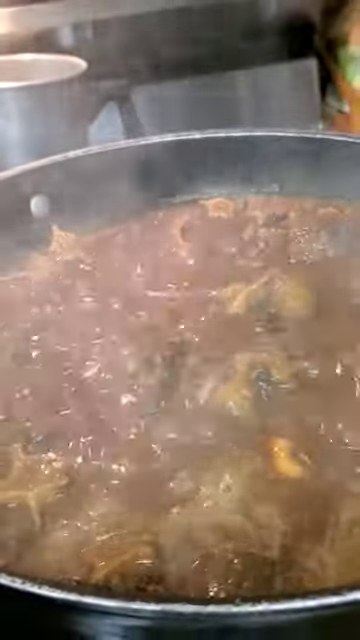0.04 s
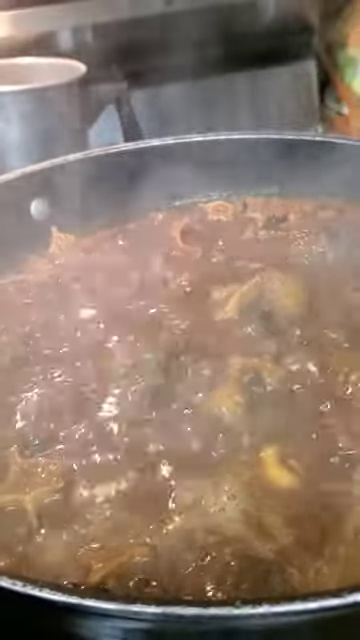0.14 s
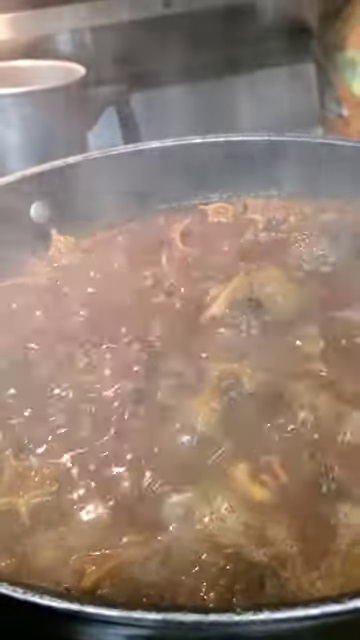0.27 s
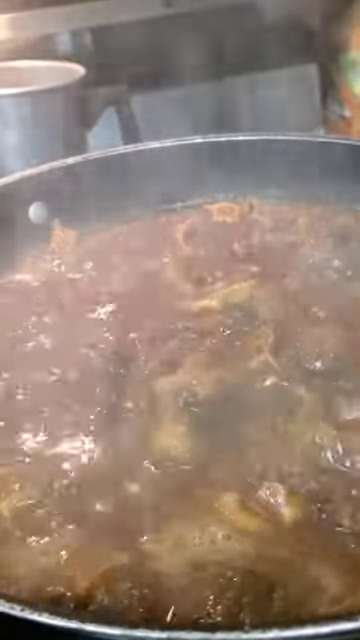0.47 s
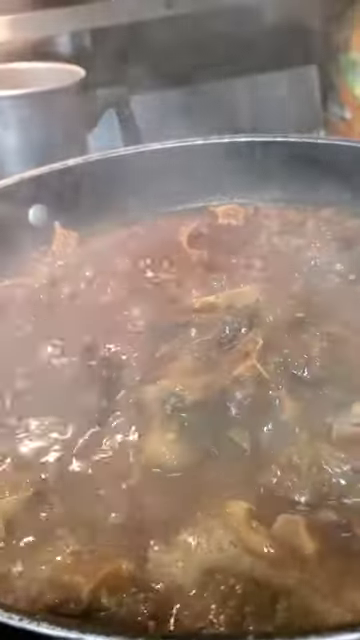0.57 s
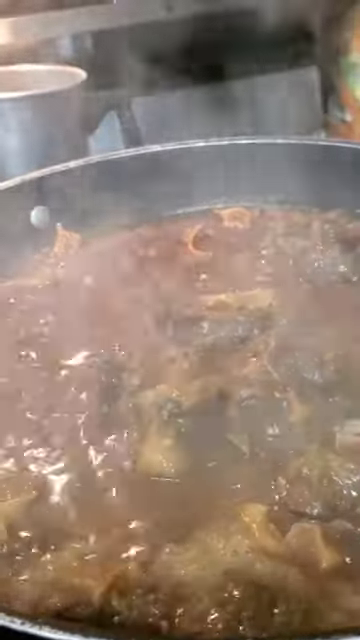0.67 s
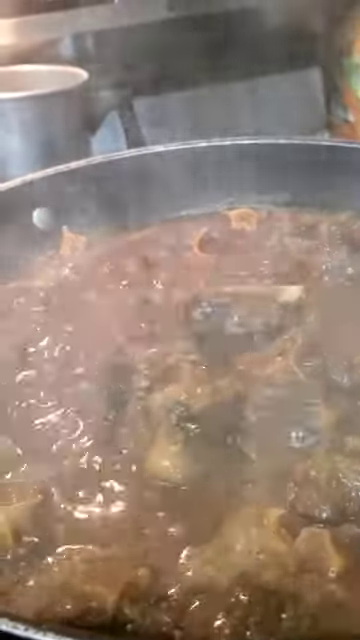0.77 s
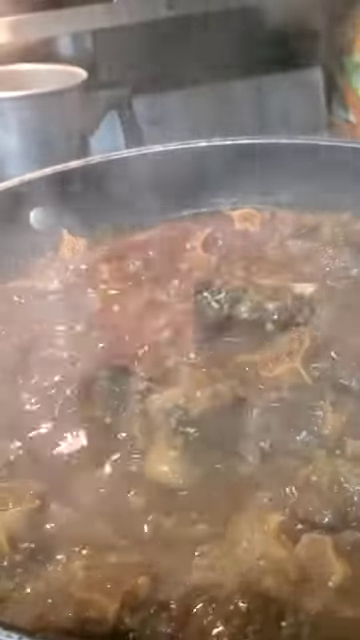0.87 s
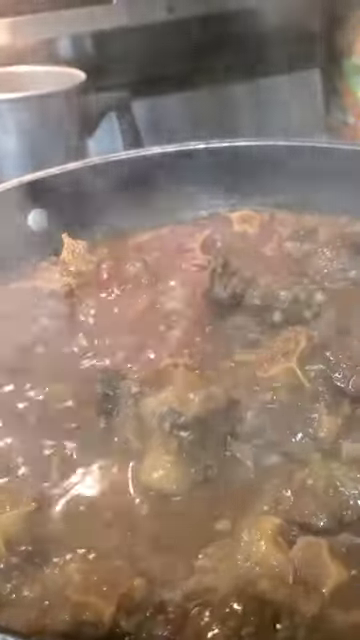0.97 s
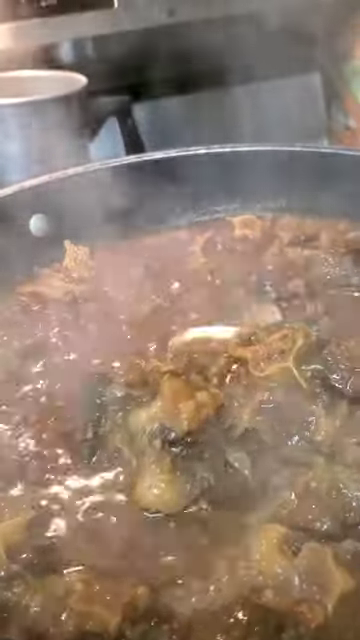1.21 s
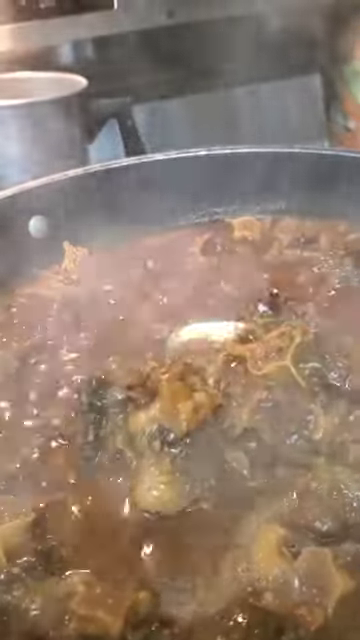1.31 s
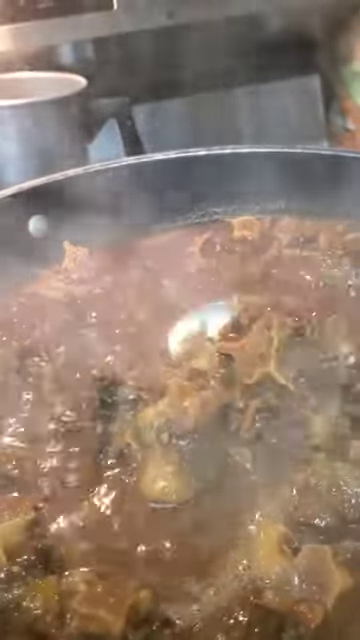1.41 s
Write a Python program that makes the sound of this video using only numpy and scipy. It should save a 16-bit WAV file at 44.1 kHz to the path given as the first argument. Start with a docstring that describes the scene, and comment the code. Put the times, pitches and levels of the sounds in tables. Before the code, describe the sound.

Close stereo sound of a heavy stew bubbling steadily in a home kitchen, slightly stronger on the left; a sharp short clack and brief chafing come early, then plops, tiny fat spits, faint hiss and low hum continue.

```python
"""Thick gravy boils in a wide pan close by: damped tones that rise in pitch make dull, dense bubbles.
A few pop out louder, and thin spits of fat are short bursts of bright noise.
A piece of cookware is knocked hard on the right, then lightly: decaying modes ring with a noise crack,
chafing noise drives the same ring, and a decaying noise tail is the kitchen's answer.
Behind it lie steam (shaped noise, patchy in level) and a burner (low noise roar and wavering hum)."""
import sys
import numpy as np
from scipy import signal
from scipy.fft import rfft, irfft, next_fast_len
from scipy.io import wavfile
from scipy.ndimage import uniform_filter1d, map_coordinates

SR = 44100
rng = np.random.default_rng(int(sys.argv[2]) if len(sys.argv) > 2 else 0)


def volts_from_decibels(level):
    """Turn decibel levels (scalar or array-like) into linear amplitude factors."""
    exponent = np.asarray(level, float) / 20
    return 10 ** exponent


def generate_wav(signal):
    """Clip the signal to [-1, 1] and save it as 16-bit WAV at the path in sys.argv[1]."""
    frames = np.transpose(np.atleast_2d(signal))
    scaled = np.clip(frames, -1, 1) * 32767
    pcm = np.round(scaled).astype(np.int16)
    wavfile.write(sys.argv[1], SR, pcm)


N = 63945

# Loud bubbles. Each row: start in seconds, peak in dB before low cut and stereo lean,
# starting pitch in Hz, life in cycles (to fall by 30 dB).
LOUD_BUBBLES = [(0.034, -38.5, 693, 12.4), (0.045, -43.5, 680, 17), (0.058, -33.5, 652, 11),
                (0.067, -34, 680, 2.7), (0.083, -42, 627, 2), (0.153, -35.5, 566, 3.1),
                (0.162, -41, 680, 3.9), (0.191, -42, 580, 11), (0.4179, -38.5, 694, 5.2),
                (0.503, -37.5, 770, 2.4), (0.656, -40, 734, 17), (0.678, -33, 720, 1.1),
                (0.733, -44, 710, 12), (0.7565, -36.5, 705, 5.3), (0.768, -37.5, 665, 8.4),
                (0.804, -38.5, 573, 7.4), (0.815, -41.5, 560, 9.3), (0.829, -41.5, 510, 5.7),
                (0.891, -39.5, 635, 10), (0.921, -36, 666, 7.3), (0.977, -29, 640, 4.2),
                (0.994, -35.5, 590, 8.1), (1.001, -35.5, 630, 0.76), (1.033, -37.5, 613, 3.3),
                (1.045, -36, 730, 1.8), (1.122, -35, 610, 2.1), (1.127, -37.5, 795, 3.1),
                (1.158, -38.5, 532, 5.2), (1.166, -42, 710, 3.7), (1.199, -43.5, 600, 2.3),
                (1.243, -41.5, 614, 5.3), (1.338, -35.5, 810, 5), (1.431, -39, 607, 3.2),
                (0.4821, -40, 1090, 13), (0.5126, -32.5, 1173, 11), (0.9066, -34, 1390, 2.6),
                (0.9399, -37.5, 1050, 7.4), (0.9582, -38, 1200, 14), (1.0114, -41.5, 1086, 13),
                (1.0231, -37, 1200, 7.5), (1.077, -34.5, 1180, 3.3), (1.3159, -40, 1480, 2.8),
                (1.3417, -34.5, 1040, 6.8), (1.3977, -39, 1300, 5.9), (1.4147, -44, 1260, 5),
                (0.2089, -32.5, 950, 2), (.0085, -35.5, 2230, 4.4), (0.057, -36, 3230, 8.1),
                (.963, -40.5, 3230, 6.4), (1.039, -27, 1880, 9.7), (1.0467, -31, 3590, 14.5),
                (.366, -37, 1460, 5.3), (.595, -30, 1580, 3.5), (0.688, -35, 1630, 3.8),
                (0.7473, -39, 1340, 6.4), (0.828, -43, 1350, 3.5), (0.888, -41, 1160, 6.2),
                (0.9946, -40, 1220, 6.4), (1.1772, -41, 1210, 8.4), (1.261, -40, 1160, 3.9),
                (1.266, -42.5, 690, 1.8), (1.1605, -38, 1250, 5.9), (0.921, -41, 1290, 4),
                (1.0405, -35, 2450, 6.6), (.905, -40, 696, 4), (1.0339, -35, 1040, 3)]
# Thin spits of fat. Each row: start in seconds, level in dB before the tone filter and stereo lean.
FAT_SPITS = [(0.655, -30), (0.9913, -30.5), (1.042, -41), (1.3963, -30)]
# Strength of the boil over time. Each row: time in seconds, level in dB.
BOIL_STRENGTH = [(0, -39), (.09, -49.5), (.13, -51.5), (.2, -41.5), (.4, -45), (.5, -40.5), (.6, -43.5),
                 (.7, -50.5), (.8, -46.5), (.86, -54), (.9, -50.5), (1.04, -41.5), (1.09, -66),
                 (1.15, -48.5), (1.29, -55), (1.45, -50)]
# Modes of the knocked object. Each row: frequency in Hz, relative left level in dB,
# relative right level in dB, time to fall by 60 dB in seconds.
OBJECT_MODES = [(121, -28, -27, 0.15), (310.6, -39, -39, 0.71), (414.4, -28.5, -25.5, 0.3),
                (523, -13.5, -15, 0.047), (770, -4, 0, 0.022), (944, -6.5, -9, 0.037),
                (1153, 2.5, 3, 0.018), (1390, 3.5, -3.5, 0.016), (815, -29, -27.5, 0.48),
                (1101, -41, -36, 0.29), (1346, -34.5, -32.5, 0.34), (2020, -47, -38, 0.3),
                (1953, 0, 8.5, 0.012), (2275, 1.5, -18, 0.0094), (2794, -5.5, -7.5, 0.017),
                (2917, -29.5, -24, 0.31), (3204, -3, 9, 0.0068), (4184, -35, 2.5, 0.0065),
                (5630, -12, -16.5, 0.014), (6650, -15, -26, 0.01)]
# Colour of the knock's crack and clatter. Each row: frequency in Hz, relative level in dB.
CRACK_COLOUR = [(40, -42), (200, 2), (600, -44), (1100, -18.5), (1600, -2), (2700, -3), (5200, -15.5),
                (8000, -23.5), (11000, -55), (15000, -35)]
# The object touches down again. Each row: time in seconds, level in dB.
TOUCHDOWNS = [(0.231, -22), (.3362, -32)]
# Light chafing of the same object. Each row: start in seconds, length in seconds, level in dB,
# centre of its brightness in Hz.
CHAFINGS = [(0.289, 0.11, -23, 3540), (0.482, 0.11, -29, 3500), (0.557, 0.091, -27.5, 1600)]
# Decay of the kitchen's answer. Each row: frequency in Hz, time to fall by 60 dB in seconds.
KITCHEN_DECAY = [(150, 0.069), (800, 0.34), (3000, 0.3), (7000, 0.24), (14000, 0.05)]
# Colour of the steam. Each row: frequency in Hz, relative level in dB per Hz.
STEAM_COLOUR = [(710, -26), (1200, -1.5), (1610, -1.5), (2270, -2), (3040, -1), (3820, -1), (5790, 1.5),
                (8880, -11.5), (14500, -9.5)]
# Stereo lean of the steam. Each row: frequency in Hz, extra left minus right gain in dB.
STEAM_LEAN = [(1500, -1), (5000, 1.5), (9000, 17.5), (14000, -0.5)]
# Colour of burner and kitchen. Each row: frequency in Hz, relative level in dB per Hz.
ROAR_COLOUR = [(12, -43), (20, -14), (75, 3), (157, 2), (301, 3), (360, -7.5), (630, 4), (841, -1),
               (990, -15), (1500, -36), (1950, -48), (3300, -120)]
# Hum of a machine nearby. Each row: frequency in Hz, sine amplitude in dB.
HUM_TONES = [(69, -65), (121, -68.5)]
# Likeness of left and right in the noises. Each row: frequency in Hz, correlation from -1 to 1.
LIKENESS = [(60, 0.81), (180, 1), (550, 0.25), (1650, 0.34), (4970, -0.27), (15000, 0.17)]

# Small bubbles: middle pitch, its spread (natural log), mean life (cycles)
SMALL_PER_S, SMALL_HZ, SMALL_SPREAD, SMALL_CYCLES = 410, 822, 0.59, 2.33
SMALL_SIZE_DB, SMALL_TOP_DB, SMALL_DB = 1.5, 9, -1.5  # size spread, largest over least, trim
PITCH_RISE, SOFT_CYCLES = .3, .6  # share of pitch gained per life, soft start
OVERTONE_RATIO, OVERTONE_DB = 2.28, -12  # a bursting bubble's short upper partial
PLOP_LOW_HZ = 318  # bursts carry little below this
PAN_LAG_S, PAN_LEAN_DB = .00009, 5.5  # the right hears the pan later and weaker

KNOCK_S, KNOCK_DB, RIGHT_EARLY_S, SWELL_CYCLES = .2274, -6, .00021, 1.87
CRACK_RISE_S, CRACK_DB, CRACK_T60_S = .0003, -10, .009
CLATTER_DB, CLATTER_T60_S = -20, 0.1
WAVER_RAD, WAVER_PER_S = 1.3, 45  # phase drift of the loose object's modes
# The loose object's ring is uneven in level, less so in the bass
FLUTTER_DB, FLUTTER_PER_S, FLUTTER_FROM_HZ = 5, 90, 800
CHAFING_OCTAVES = 1.5  # width of the chafing's colour
KITCHEN_PAN_DB, KITCHEN_KNOCK_DB, KITCHEN_GAP_S = -13, -15, .004

STEAM_DB, STEAM_PATCHY_DB, ROAR_DB = -55, 1.5, -54.5
CEILING, KNEE, TOP_HZ = .9, 4, 14650  # a soft limit keeps the highest peaks from clipping


def unit(x):
    """Scale to rms 1."""
    return x / np.sqrt(np.mean(x ** 2) + 1e-20)


def along(points, hz):
    """Read a curve of (Hz, value) points on a log frequency axis."""
    f, value = np.transpose(points)
    return np.interp(np.log(hz + 1), np.log(f + 1), value)


def wobble(rate):
    """A smooth random curve, rate knots a second."""
    knots = rng.standard_normal(int(N * rate / SR) + 4)
    return map_coordinates(knots, [np.arange(N) * rate / SR])


def filtered(x, response):
    """Shape x by a complex response of frequency."""
    m = next_fast_len(len(x.T) + 8192)
    return irfft(rfft(x, m) * response(np.fft.rfftfreq(m, 1 / SR)), m)[..., :len(x.T)]


def alike(pair):
    """Mix two unrelated noises into left and right with the tabled likeness, closest in the bass."""
    def turn(hz):
        return np.arccos(np.clip(along(LIKENESS, hz), -1, 1)) / 2

    mid, side = filtered(pair, lambda hz: np.array([np.cos(turn(hz)), np.sin(turn(hz))]))
    return np.array([mid + side, mid - side])


def rush(spectrum, patchy_db):
    """Stereo noise of mid rms 1 with patches of random gain in time and frequency."""
    z = signal.stft(rng.standard_normal((2, N)), nperseg=512)[2]
    patches = uniform_filter1d(uniform_filter1d(rng.standard_normal(z.shape), 6, 1), 8, 2)
    pair = signal.istft(z * volts_from_decibels(patchy_db * unit(patches)), nperseg=512)[1][:, :N]
    pair = alike(filtered(pair, lambda hz: volts_from_decibels(along(spectrum, hz))))
    return pair / np.std(pair.mean(0))


def bubbles(s, db, hz, cycles, lean_db, lag_s):
    """Each bubble is a damped tone that rises in pitch; it falls by 60 dB in twice its cycles."""
    out, step = np.zeros((2, N)), np.arange(1400)
    cycles = np.clip(cycles, .7, 30)[:, None]
    for ch, sign in enumerate((1, -1)):
        start = (s - sign * lag_s / 2) * SR
        first = np.ceil(start).astype(int)[:, None]
        u = (first - start[:, None] + step) / SR * hz[:, None]  # age in starting periods
        soft_start = 1 - np.exp(-u / SOFT_CYCLES)
        turns = u * (1 + PITCH_RISE / 2 * np.minimum(u / cycles, 2))
        tone = np.sin(2 * np.pi * turns) * volts_from_decibels(-30 * u / cycles) * soft_start
        overtone = volts_from_decibels(OVERTONE_DB - 70 * u / cycles) * np.sin(2 * np.pi * OVERTONE_RATIO * u)
        tone += overtone * soft_start
        tone *= volts_from_decibels(db + sign * lean_db / 2)[:, None] / np.abs(tone).max(1, keepdims=True)
        out[ch] = np.bincount(np.clip(first + step, 0, N).ravel(), tone.ravel(), N + 1)[:N]
    return out


def small_bubbles():
    """A dense bed with random gaps, sizes, pitches, lives and places, under the boil's strength."""
    gap, size, pitch, life, place = rng.random((700, 5)).T
    s = np.cumsum(-np.log(gap)) / SMALL_PER_S
    size_db = np.minimum(-SMALL_SIZE_DB * np.log(size), SMALL_TOP_DB)
    db = size_db + np.interp(s, *np.transpose(BOIL_STRENGTH)) + SMALL_DB
    bell = np.log(pitch / (1 - pitch)) * np.sqrt(3) / np.pi  # logistic, deviation 1
    hz = np.clip(SMALL_HZ * np.exp(SMALL_SPREAD * bell), 380, 6000)
    lean_db = PAN_LEAN_DB + 3 * (place - .5)
    lag_s = PAN_LAG_S * 2 * (.5 + place)
    return bubbles(s, db, hz, SMALL_CYCLES * (.5 + life), lean_db, lag_s)


def fat_spits():
    """Each spit is a sudden burst of bright noise that falls by 60 dB in 18 ms."""
    t, level = np.arange(N) / SR, np.zeros(N)
    for s, db in FAT_SPITS:
        level += volts_from_decibels(db - 60 * np.clip(t - s, 0, 1) / 0.018) * (t > s)

    def bright(hz):
        return (hz / 6000) ** 2 / (1 + (hz / 6000) ** 2) / (1 + (hz / 9000) ** 8)

    return filtered(level * rng.standard_normal((2, N)), bright) * volts_from_decibels([[2.5], [-2.5]])


def gravy():
    """Small and loud bubbles, thinned in the bass by a gentle low cut, with the spits on top."""
    s, db, hz, cycles = np.transpose(LOUD_BUBBLES)
    loud = bubbles(s, db, hz, cycles, PAN_LEAN_DB, PAN_LAG_S)
    plops = filtered(small_bubbles() + loud, lambda hz: 1j * hz / (PLOP_LOW_HZ + 1j * hz))
    return plops + fat_spits()


def object_answer():
    """One blow rings the modes, each swelling over a few cycles, and adds a crack and clatter of noise."""
    size = SR // 2
    t = np.clip(np.arange(size) / SR - [[RIGHT_EARLY_S], [0]], 0, None)
    ring = np.zeros(t.shape)
    for k, (hz, left, right, t60) in enumerate(OBJECT_MODES):
        flutter = FLUTTER_DB * wobble(FLUTTER_PER_S)[:size] * np.minimum(t / 0.026, 1)
        drift = WAVER_RAD * wobble(WAVER_PER_S)[:size] * np.minimum(t / 0.042, 1)
        db = np.array([[left], [right]]) - 60 * t / t60 + flutter * min(hz / FLUTTER_FROM_HZ, 1)
        swell = 1 - np.exp(-(t * hz / SWELL_CYCLES) ** 2)
        ring += (-1) ** k * volts_from_decibels(db) * swell * np.sin(2 * np.pi * hz * t + drift)
    noise = rng.standard_normal(t.shape)
    noise = unit(alike(filtered(noise, lambda hz: volts_from_decibels(along(CRACK_COLOUR, hz)))))
    crack = volts_from_decibels(CRACK_DB - 60 * t / CRACK_T60_S)
    clatter = volts_from_decibels(CLATTER_DB - 60 * t / CLATTER_T60_S)
    return ring + (1 - np.exp(-t / CRACK_RISE_S)) * (crack + clatter) * noise


def knock():
    """Single impulses strike the object; light chafing drives the same answer with noise."""
    answer = object_answer()
    drive, t = np.zeros(N), np.arange(N) / SR
    for s, length, db, bright_hz in CHAFINGS:
        grit = filtered(rng.standard_normal(N),
                        lambda hz: np.exp(-(np.log2((hz + 1) / bright_hz) / CHAFING_OCTAVES) ** 2))
        stroke = np.sin(np.pi * np.clip((t - s) / length, 0, 1))
        drive += volts_from_decibels(db) / np.sqrt(length * SR) * stroke * grit
    for s, db in [(KNOCK_S, KNOCK_DB)] + TOUCHDOWNS:
        drive[round(s * SR)] = volts_from_decibels(db)
    return signal.fftconvolve(drive[None], answer, axes=1)[:, :N]


def kitchen(x):
    """The room answers with a noise tail in which each frequency dies at its own speed."""
    hz, t, z = signal.stft(alike(rng.standard_normal((2, SR // 2))), SR, nperseg=256)
    decay = volts_from_decibels(-60 * t / along(KITCHEN_DECAY, hz)[:, None])
    tail = signal.istft(z * decay, SR, nperseg=256)[1]
    tail = np.pad(tail / np.linalg.norm(tail[0]), ((0, 0), (round(KITCHEN_GAP_S * SR), 0)))
    return signal.fftconvolve(x, tail, axes=1)[:, :N]


def steam():
    """Fine noise hiss, slightly unsteady, leaning left in the treble."""
    hiss = volts_from_decibels(STEAM_DB + .4 * wobble(12)) * rush(STEAM_COLOUR, STEAM_PATCHY_DB)
    return filtered(hiss, lambda hz: volts_from_decibels(np.outer([.5, -.5], along(STEAM_LEAN, hz))))


def machine_hum():
    """Low sines whose phase wanders, equal on both sides."""
    t = np.arange(N) / SR
    return sum(volts_from_decibels(db) * np.sin(2 * np.pi * hz * t + 1.66 * wobble(9.1)) for hz, db in HUM_TONES)


def burner():
    """Nearly steady low noise roar with the wavering hum."""
    roar = volts_from_decibels(.6 * wobble(3)) * rush(ROAR_COLOUR, patchy_db=1.2)
    return volts_from_decibels(ROAR_DB) * roar + machine_hum()


def scene():
    """Pan and knock, their answer in the kitchen, then steam and burner."""
    pan, blow = gravy(), knock()
    room = kitchen(volts_from_decibels(KITCHEN_PAN_DB) * pan + volts_from_decibels(KITCHEN_KNOCK_DB) * blow)
    return pan + blow + room + steam() + burner()


def low_pass(x):
    """Removes everything above the highest recorded frequency."""
    return signal.sosfilt(signal.butter(12, 15790, fs=SR, output="sos"), x)


def record(dry):
    """A soft limit keeps the highest peaks from clipping, then a steep cut removes the top treble."""
    soft = dry / (1 + np.abs(dry / CEILING) ** KNEE) ** (1 / KNEE)
    finished = filtered(soft, lambda hz: hz < TOP_HZ)
    return low_pass(finished)


dry = scene()
out = record(dry)
generate_wav(out)
```